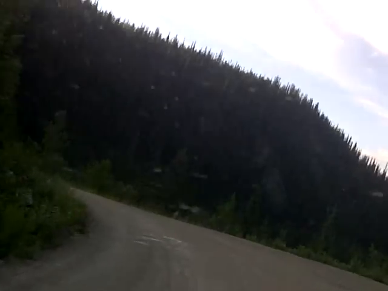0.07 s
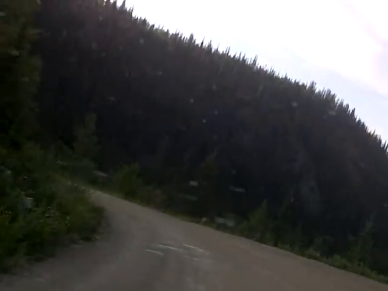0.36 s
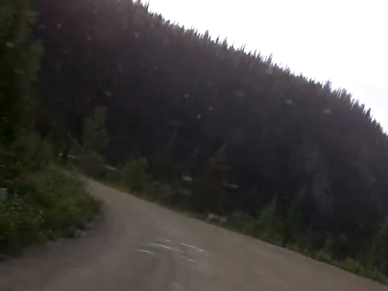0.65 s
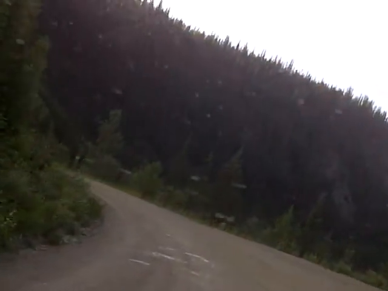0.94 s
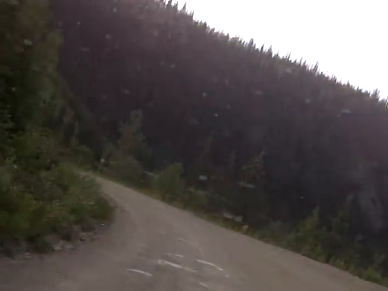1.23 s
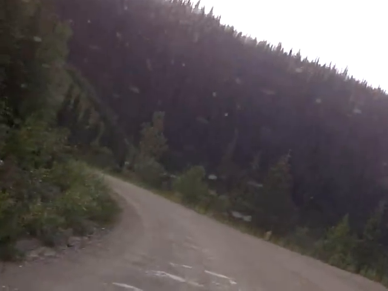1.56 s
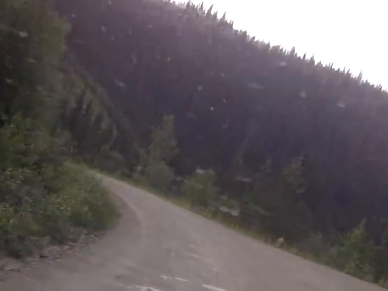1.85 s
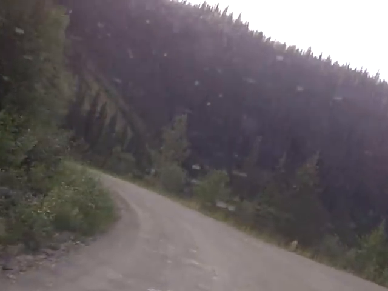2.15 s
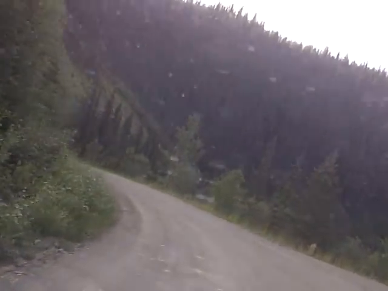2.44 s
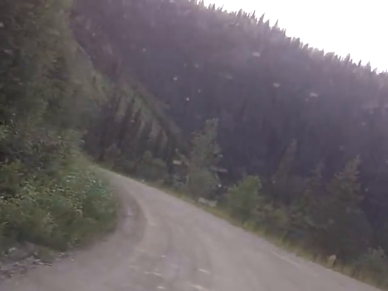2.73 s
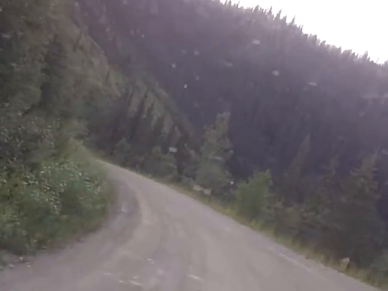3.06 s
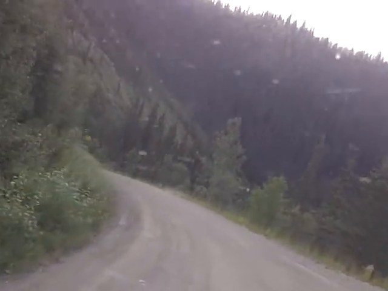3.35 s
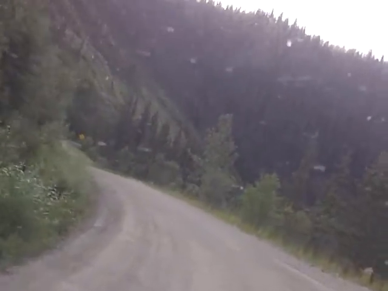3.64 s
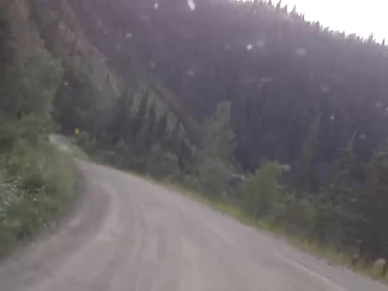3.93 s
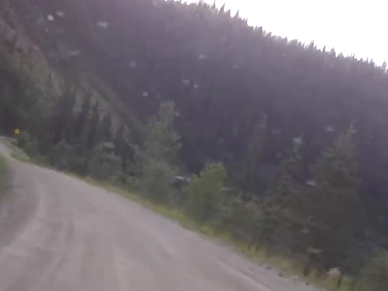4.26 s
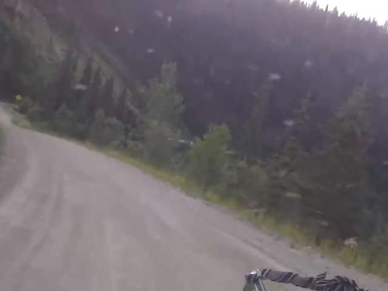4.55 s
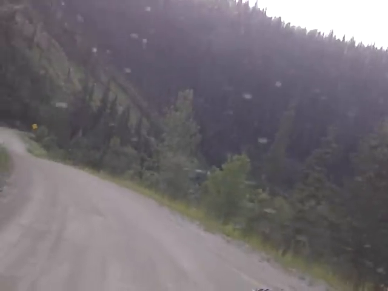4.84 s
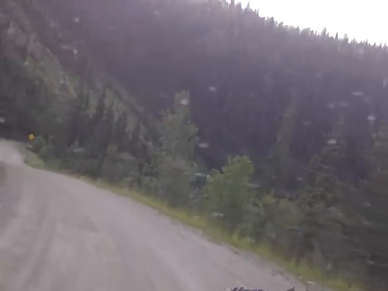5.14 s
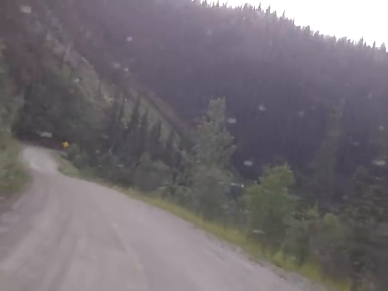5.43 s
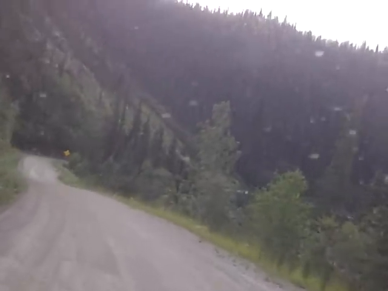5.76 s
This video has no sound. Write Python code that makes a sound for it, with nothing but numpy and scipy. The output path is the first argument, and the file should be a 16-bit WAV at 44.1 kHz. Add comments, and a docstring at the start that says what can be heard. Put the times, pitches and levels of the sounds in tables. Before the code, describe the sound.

Tyres rumble and crunch along a gravel road, heard on board, with stones ticking underneath and ruts rattling the body.

```python
"""Tyres rolling on a gravel road, heard from on board: they rumble through the body and crunch loose stones.
Flung stones tick against the underside, chips of grit ping, and bumps make the body drum.
Ruts jolt and rattle it, hardest near 4 s, and a hollow panel is knocked near 5 s.
The rolling is noise shaped by spectra and resonances; the impacts are damped tones and noise bursts."""
import sys
import numpy as np
from scipy import signal
from scipy.fft import rfft, irfft, next_fast_len
from scipy.io import wavfile
from scipy.ndimage import map_coordinates

SR = 44100
rng = np.random.default_rng(int(sys.argv[2]) if len(sys.argv) > 2 else 0)


def digitize_waveform(pressure):
    """Quantize a signal to 16-bit integers and store it at the path in sys.argv[1].

    Rows of a 2-D input are taken as channels; values are limited to [-1, 1].
    """
    field = np.atleast_2d(pressure).T
    bounded = np.clip(field, -1, 1)
    quanta = np.round(bounded * 32767).astype(np.int16)
    wavfile.write(sys.argv[1], SR, quanta)


N = 264159

# road roughness relative to an ordinary stretch: time_s, roughness_db
ROUGHNESS = [(0.0, 0.5), (0.14, 0.5), (0.44, 0.2), (0.58, -2.5), (0.85, 1), (1.03, 0), (1.65, 0.5),
             (1.93, 1.5), (2.38, -2.5), (2.8, 1), (3.42, 1.5), (3.66, 1.5), (3.85, 1.9), (4.02, 3.5),
             (4.25, 0), (4.6, 4.5), (4.88, 1.5), (5.45, -0.5), (5.74, -3), (5.88, -2.5)]
# ruts that shake the body: start_s, rattle_db, thud_db, clack_db
RUT_JOLTS = [(0.364, -31, -30, -40.5), (0.823, -26.5, -38, -42), (1.451, -34.5, -40, -50),
             (1.478, -32, -32, -53), (1.517, -39.5, -38, -36), (1.539, -25, -23.5, -47),
             (1.564, -34, -34, -51), (1.737, -24.5, -27, -45), (1.794, -23.5, -27, -40.5),
             (1.862, -25, -35, -38.5), (1.892, -30, -35.5, -53), (2.108, -30, -38, -43),
             (2.136, -27, -37.5, -48), (2.182, -29.5, -38, -42), (2.222, -30, -35, -52),
             (2.768, -30, -32, -42.5), (2.822, -29.5, -34, -44), (2.847, -29.5, -40, -47.5),
             (3.181, -26, -29.5, -58), (3.235, -26, -26, -39.5), (3.308, -21, -26, -36),
             (3.378, -25.5, -29, -37.5), (3.42, -26, -28, -34), (3.433, -27, -41, -52),
             (3.488, -21.5, -29.5, -33.5), (3.545, -25, -25, -42.5), (3.570, -33, -37, -48),
             (3.983, -22, -26, -31), (3.995, -27.5, -21.5, -54), (4.014, -19, -35, -44),
             (4.032, -19, -29, -26), (4.051, -26.5, -30, -44.5), (4.075, -28, -29, -47),
             (4.089, -23, -26, -39), (4.102, -20.5, -37.5, -33), (4.131, -23, -44, -34),
             (4.156, -33, -30, -38.5), (4.482, -26, -28.5, -33), (4.497, -30, -29, -37),
             (4.537, -26, -37, -41), (4.560, -27, -30.5, -42), (4.579, -28.5, -35, -44),
             (4.607, -24, -28, -41.5), (4.624, -25, -24, -42), (4.640, -28, -29, -42.5),
             (4.654, -25.5, -28, -40), (4.682, -29.5, -23, -37.5), (5.158, -29, -31, -47),
             (5.217, -26.5, -38, -51), (5.270, -28, -34, -40), (5.288, -26.5, -41, -38.5),
             (5.612, -30, -30, -44), (5.690, -32, -32, -51)]
# tyre vibration heard through the body: frequency_hz, level_db
TYRE_SPECTRUM = [(50, -41.5), (80, 1.5), (105, 0), (145, 0.5), (200, 0), (230, -5), (300, -9), (450, -16),
                 (700, -34), (2000, -88)]
# splintering stone and scattering grit: frequency_hz, level_db
SPLINTER_SPECTRUM = [(1500, -38.5), (2800, 3.5), (3600, -1.5), (4500, -1.5), (5500, -16.5), (7200, -24)]


def amp(db):
    """Amplitude ratio of a level in decibels."""
    return 10 ** (np.asarray(db) / 20)


def unit(x):
    """Normalisation to rms 1."""
    return x / np.sqrt(np.mean(x ** 2) + 1e-20)


def roughness_db():
    """Linear interpolation of the road's roughness to every sample."""
    return np.interp(np.arange(N) / SR, *np.transpose(ROUGHNESS))


def swells(rows):
    t = np.arange(N) / SR
    return sum(np.outer(levels_db, np.exp(-(2 * (t - centre_s) / length_s) ** 2))
               for centre_s, length_s, *levels_db in rows)


def wobble(rate_hz):
    """Smooth random fluctuation: a spline through Gaussian values."""
    return map_coordinates(rng.standard_normal(1024), [np.arange(N) * rate_hz / SR + 2], mode="mirror")


def filtered(x, response):
    """Linear filtering: the spectrum is multiplied by a frequency response."""
    size = next_fast_len(len(x) + 8192)
    return irfft(rfft(x, size) * response(np.fft.rfftfreq(size, 1 / SR)), size)[:len(x)]


def coloured(x, spectrum):
    """Spectral shaping, interpolated over log frequency; the result has rms 1."""
    hz, db = np.transpose(spectrum)
    return unit(filtered(x, lambda f: amp(np.interp(np.log(f + 1), np.log(hz), db))))


def resonant(x, modes):
    """Forced vibration of damped modes in parallel; the result has rms 1."""
    return unit(filtered(x, lambda f: sum(amp(db) * 1j * f * width / (hz * hz - f * f + 1j * f * width)
                                          for hz, width, db in modes)))


def burst(spectrum, attack_s, t60_s):
    """Closely spaced contacts merge into noise that rises quickly and decays exponentially."""
    t = np.arange(SR // 5) / SR
    envelope = (1 - np.exp(-t / attack_s)) * amp(-60 * t / t60_s)
    hit = coloured(rng.standard_normal(len(t)), spectrum) * envelope
    return hit * np.linalg.norm(envelope) / np.linalg.norm(hit) / envelope.max()


def ping(pitch_hz, t60_s):
    """A struck resonance: a brief chattering force convolved with a damped sinusoid."""
    t = np.arange(SR // 8) / SR
    contact = rng.standard_normal(len(t)) * amp(-60 * t / 0.011)
    mode = np.sin(2 * np.pi * pitch_hz * t) * amp(-60 * t / t60_s)
    ring = signal.fftconvolve(contact, mode)[:len(t)]
    return ring / np.abs(ring).max()


def knock():
    """Free vibration: soft contacts in quick succession excite the modes of a hollow panel."""
    # contacts on the panel: start_s, level_db
    contacts = [(5.033, -27), (5.0388, -23.5), (5.063, -32.5)]
    # modes of the panel: pitch_hz, level_db, t60_s
    modes = [(346, -15, 0.19), (431, -0.5, 0.097), (673, 7.5, 0.023), (1080, -8, 0.037),
             (2040, -11.5, 0.033)]
    out, t = np.zeros(N), np.arange(SR // 5) / SR
    ring = sum(amp(db - 60 * t / t60_s) * np.sin(2 * np.pi * hz * t) for hz, db, t60_s in modes)
    onset = 1 - np.exp(-t / 0.0021)
    for start_s, level_db in contacts:
        add(out, start_s, amp(level_db) * ring * onset)
    return out


def bumps():
    """The tyre's compliance softens each bump, and the body drums for a few uneven cycles."""
    # thumps of the body: start_s, peak_db, pitch_hz
    thumps = [(0.255, -29, 146), (0.835, -29.5, 146), (1.299, -28, 170), (1.477, -35, 150),
              (1.736, -28.5, 140), (1.951, -25, 159), (3.367, -24.5, 139), (3.754, -29, 150),
              (3.874, -34, 163), (3.938, -24, 169), (4.017, -25, 160.5), (4.764, -32.5, 190),
              (4.826, -26.5, 184), (4.863, -30, 203), (5.171, -27, 169)]
    rise_s, pitch_wander = 0.011, 0.067
    out, t = np.zeros(N), np.arange(SR // 8) / SR
    envelope = (t / rise_s * np.exp(1 - t / rise_s)) ** 2
    for start_s, peak_db, pitch_hz in thumps:
        hz = pitch_hz * (1 + pitch_wander * wobble(100)[:len(t)])
        add(out, start_s, amp(peak_db) * envelope * np.sin(2 * np.pi * np.cumsum(hz) / SR))
    return out


def ruts():
    """Shock excitation: a rut thuds through the suspension, the body rattles, fittings clack and ring."""
    # the rattling body: frequency_hz, level_db
    rattle_spectrum = [(150, -38.5), (380, 8.5), (560, 3.5), (700, 6), (950, 8), (1250, -1), (1500, -2.5),
                       (2300, -19), (2900, -22.5), (7000, -41.5)]
    # the bright clack of loose fittings: frequency_hz, level_db
    clack_spectrum = [(900, -20.5), (1600, 0.5), (2300, 1.5), (2900, -10), (3400, -23), (7000, -44)]
    fitting_hz, scatter_octaves = 932, 0.27
    out = np.zeros(N)
    for start_s, rattle_db, thud_db, clack_db in RUT_JOLTS:
        rattle = amp(rattle_db - 10.5) * burst(rattle_spectrum, attack_s=0.001, t60_s=0.08)
        ring_hz = fitting_hz * 2 ** (scatter_octaves * rng.standard_normal())
        add(out, start_s, amp(rattle_db - 14.5) * ping(ring_hz, t60_s=0.05))
        clack = amp(clack_db - 7) * burst(clack_spectrum, attack_s=0.0005, t60_s=0.055)
        thud = amp(thud_db - 7) * burst(TYRE_SPECTRUM, attack_s=0.0054, t60_s=0.066)
        add(out, start_s, rattle + clack + thud)
    return out


def chips():
    """Small chips of grit each excite one high resonance and scatter with a burst of noise."""
    # chip impacts: start_s, level_db, pitch_hz
    impacts = [(0.079, -51.5, 3850), (0.758, -50, 3800), (1.203, -54.5, 3865), (1.661, -49, 4130),
               (1.715, -49.5, 4140), (1.899, -57, 4250), (2.044, -51, 4010), (2.100, -49.5, 5390),
               (3.103, -51, 5000), (4.402, -53, 4320), (4.814, -50.5, 4490), (5.023, -51.5, 4100),
               (5.081, -50.5, 4760), (5.625, -56.5, 4200)]
    out = np.zeros(N)
    for start_s, level_db, pitch_hz in impacts:
        add(out, start_s, amp(level_db - 2) * ping(pitch_hz, t60_s=0.046))
        add(out, start_s, amp(level_db - 8) * burst(SPLINTER_SPECTRUM, attack_s=0.0016, t60_s=0.062))
    return out


def bending_wave(start_hz, travel_s, t60_s):
    """Dispersion in sheet metal: high frequencies arrive first, and edge echoes roughen the glide."""
    t = np.arange(SR // 10) / SR
    hz = start_hz / (1 + t / travel_s) ** 2
    envelope = (1 - np.exp(-t / 0.001)) * amp(-60 * t / t60_s)
    direct = envelope * np.sin(2 * np.pi * np.cumsum(hz) / SR)
    reflections = rng.standard_normal(len(t)) * amp(-60 * t / 0.03)
    echoes = signal.fftconvolve(direct, reflections)[:len(t)]
    return direct + amp(-6) * echoes * np.linalg.norm(direct) / np.linalg.norm(echoes)


def stones():
    """Impact excitation: flung stones tick on the underside, clatter, splinter and ring its panel."""
    # stone impacts: start_s, level_db, clatter_db, splinter_db, ring_db, tick_start_hz
    impacts = [(0.2186, -36, -7, -18.5, -10.5, 3130), (0.751, -42.5, -6.5, -15, -8, 2730),
               (1.139, -41, -6, -26, -11, 2400), (1.177, -38, -8, -23, 0, 2880),
               (1.244, -41, -4, -25.5, -2, 3260), (1.31, -38.5, -9, -15, -4, 3130),
               (1.5158, -31.5, -3.5, -19.5, -6.5, 3260), (1.719, -46, -2.5, -8.5, -8, 2700),
               (1.843, -37.5, -6, -17.5, -7, 3090), (2.101, -43.5, -2, -13, -8, 2790),
               (2.690, -39, -9, -14, -8, 2670), (2.7545, -33.5, -7, -20, -12, 3200),
               (2.811, -36, -7.5, -16, -5, 3020), (3.104, -47.5, -13, -16, -0.5, 2800),
               (3.162, -44, -6.5, -25, -1, 2770), (3.905, -51.5, -7.5, -17, -6, 2600),
               (4.014, -34.5, -3, -23.5, -3.5, 2880), (4.031, -28, -2, -6, -12, 3240),
               (4.039, -34.5, -7.5, -7.5, -10, 2960), (4.087, -33, -9.5, -24.5, -10.5, 3060),
               (4.103, -31, -5.5, -8, -12, 3200), (4.216, -37.5, -7, -22, -7.5, 2770),
               (4.280, -42.5, -8, -18.5, 1, 2540), (4.344, -39, -10, -20, 0.5, 2750),
               (4.469, -29.5, -6.5, -21, -19, 2930), (4.556, -33.5, -4, -20, -9.5, 2680),
               (4.583, -40.5, -7.5, -22, -0.5, 2470), (4.604, -37.5, -0.5, -10.5, 0, 2580),
               (4.640, -39.5, -8, -24.5, 0.5, 2410), (4.666, -33, -6, -23.5, -4, 2520),
               (4.746, -36, -6, -17, -8, 2680), (5.116, -37.5, -5, -20, -4.5, 2650),
               (5.198, -48, -12.5, -22, 6, 2520), (5.212, -47, -13, -23, 2, 2500),
               (5.2597, -35, -3.5, -18.5, 2, 2830), (5.315, -37, -8, -19, -7.5, 2830),
               (5.361, -38, -5.5, -17, 4.5, 2520), (5.431, -42.5, -13, -21, 1, 2510),
               (5.542, -47.5, 1, -22, 2.5, 2620), (5.603, -35.5, -8.5, -9, -10.5, 2000),
               (5.765, -42, -2, -23.5, 5, 2620)]
    # clattering stone: frequency_hz, level_db
    clatter_spectrum = [(200, -1.5), (700, -4), (1300, 4), (1900, 1), (2300, 4.5), (2550, -13),
                        (2950, -12.5), (3200, -35), (7000, -32.5)]
    panel_hz, pitch_scatter = 2235, 0.028
    out = np.zeros(N)
    for start_s, level_db, clatter_db, splinter_db, ring_db, tick_start_hz in impacts:
        travel_s = 0.026 * amp(rng.standard_normal())  # each stone lands at another distance
        tick = bending_wave(tick_start_hz, travel_s, t60_s=0.033)
        clatter = amp(clatter_db) * burst(clatter_spectrum, attack_s=0.0004, t60_s=0.1)
        splinter = amp(splinter_db - 3.5) * burst(SPLINTER_SPECTRUM, attack_s=0.001, t60_s=0.055)
        ring = amp(ring_db) * ping(panel_hz * (1 + pitch_scatter * rng.standard_normal()), t60_s=0.033)
        for part in (tick, clatter, splinter, ring):
            add(out, start_s, amp(level_db) * part)
    return out


def grains(rate_hz, spread_db, t60_s, bed_power):
    """Incoherent addition: randomly crushed stones sum in power over a steady bed of finer ones."""
    t = np.arange(SR // 10) / SR
    crushed = rng.random(N) < rate_hz / SR
    sizes = crushed * amp(spread_db * np.minimum(rng.standard_normal(N), 2))
    power = np.abs(signal.fftconvolve(sizes ** 2, amp(-60 * t / t60_s) ** 2)[:N])
    return np.sqrt(power / power.mean() + bed_power) * rng.standard_normal(N)


def gravel():
    """Granular noise: treads crunch stones and spray grit, amplitude-modulated by washboard ridges."""
    # patches of deeper gravel: centre_s, length_s, extra_crunch_db, extra_spray_db
    patches = [(2.72, 0.21, 0.5, 0.5), (4.63, 0.13, -0.5, 3.5), (5.62, .05, 3, 7), (5.73, 0.15, 4.5, 2)]
    # stones crushed under the tread: frequency_hz, level_db
    crunch_spectrum = [(150, -7.5), (350, -5), (480, 1), (580, -0.5), (800, 2), (1100, 1), (1500, -2.5),
                       (1900, -10), (2300, -9.5), (2550, -22), (3200, -22.5), (7000, -72)]
    # fine flung grit: frequency_hz, level_db
    spray_spectrum = [(700, -30), (1600, 14), (2280, 11), (2500, 4), (2950, 5), (3170, 0), (3370, 3),
                      (3550, 0), (4300, -1), (5200, -5), (6200, -13.5), (7200, -86)]
    # resonances of the body: pitch_hz, width_hz, level_db
    body_modes = [(675, 21, 17.5), (840, 14, -3.5), (1315, 22, 9), (1730, 21, -17), (2000, 40, -15.5),
                  (2530, 25, -33)]
    rough_db = roughness_db()
    extra_crunch_db, extra_spray_db = swells(patches)
    ridge_hz = 15 * (1 + 0.095 * wobble(12))
    ridges = np.sin(2 * np.pi * np.cumsum(ridge_hz) / SR) + 0.5 * wobble(32)
    lead_s, lift_db = 0.03, 0.5  # the crunch rises slightly just before each rut
    rut_db = swells([(start_s - lead_s / 2, lead_s, lift_db, 0) for start_s, *_ in RUT_JOLTS])[0]
    crunch_db = -44.5 + 0.83 * rough_db + extra_crunch_db + rut_db + 0.47 * ridges
    spray_db = -53.5 + 0.47 * rough_db + extra_spray_db + 1.5 * ridges
    crunch = coloured(grains(rate_hz=300, spread_db=3.8, t60_s=0.03, bed_power=1.1), crunch_spectrum)
    ring = resonant(grains(rate_hz=200, spread_db=3, t60_s=0.05, bed_power=0.6), body_modes)
    spray = coloured(grains(rate_hz=170, spread_db=4, t60_s=0.055, bed_power=1.5), spray_spectrum)
    return amp(crunch_db) * (crunch + amp(-10) * ring) + amp(spray_db) * spray


def rumble():
    """Structure-borne sound: road roughness drives the body's sway and boom and the tyres' drone."""
    # dips that heave the body on its springs: centre_s, length_s, extra_sway_db, extra_drone_db
    dips = [(1.975, 0.3, 2, 2.5), (3.067, 0.098, 7.5, -1), (4.424, 0.28, 7, -1.5), (4.7, 0.15, 5, -2),
            (5.24, 0.078, 3.5, 0.5), (5.584, 0.15, 8, 2)]
    # the swaying body: frequency_hz, level_db
    sway_spectrum = [(8, -21), (22, -2), (32, -2), (48, -6.5), (62, 4.5), (75, -4.5), (90, -20), (130, -25),
                     (300, -88)]
    # low resonance of the body: pitch_hz, width_hz, level_db
    boom_mode = [(62.6, 2.3, 0)]
    rough_db = roughness_db()
    extra_sway_db, extra_drone_db = swells(dips)
    sway_db = -39.5 + 0.45 * rough_db + extra_sway_db
    drone_db = -37.5 + rough_db + extra_drone_db
    sway = amp(sway_db) * coloured(rng.standard_normal(N), sway_spectrum)
    boom = amp(sway_db - 23.5) * resonant(rng.standard_normal(N), boom_mode)
    drone = amp(drone_db) * coloured(rng.standard_normal(N), TYRE_SPECTRUM)
    return sway + boom + drone


def add(track, start_s, sound):
    """Superposition of a delayed sound on the track."""
    part = track[round(start_s * SR):][:len(sound)]
    part += sound[:len(part)]


def scene():
    """All sources superpose at one point on board."""
    return (rumble() + gravel() + stones() + chips() + ruts() + bumps() + knock())[None]


def record(dry):
    """Band limiting: an ideal low-pass filter removes the highest treble."""
    cutoff_hz = 7180
    return filtered(dry[0], lambda hz: hz < cutoff_hz)[None]


dry = scene()
out = record(dry)
digitize_waveform(out)
```